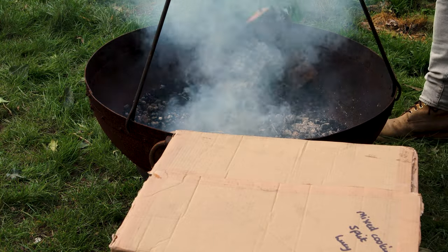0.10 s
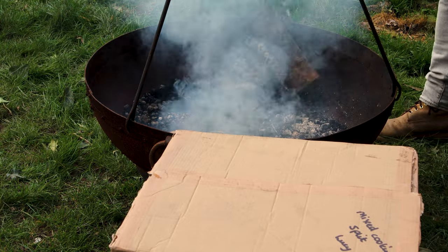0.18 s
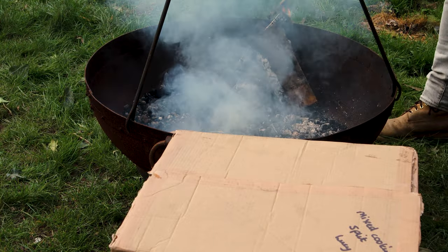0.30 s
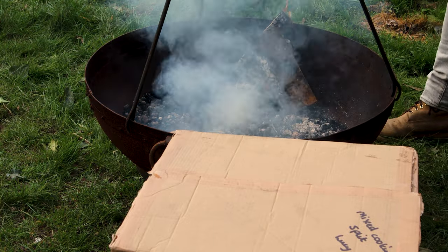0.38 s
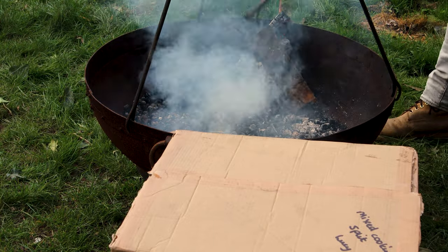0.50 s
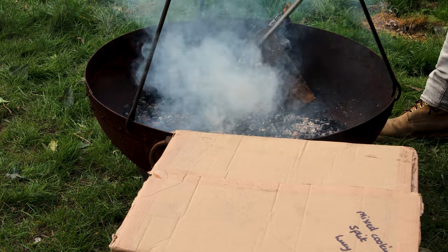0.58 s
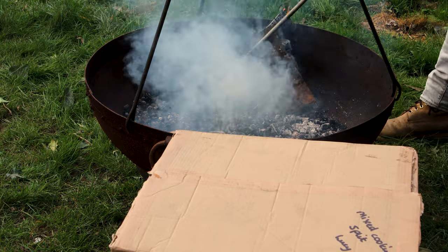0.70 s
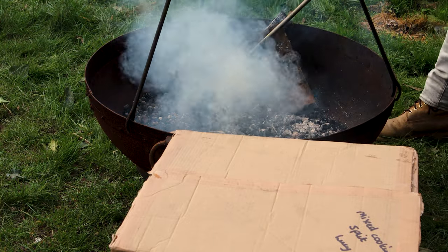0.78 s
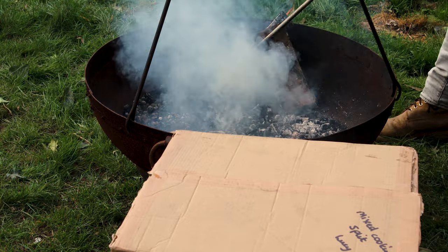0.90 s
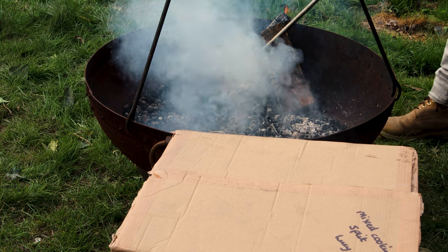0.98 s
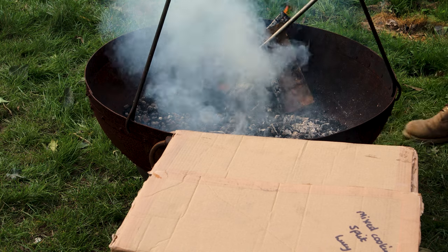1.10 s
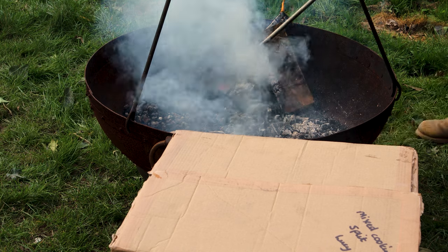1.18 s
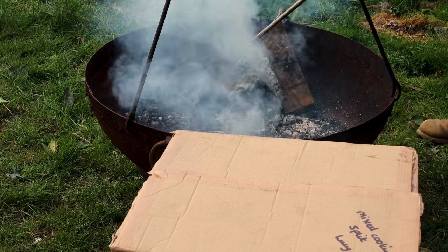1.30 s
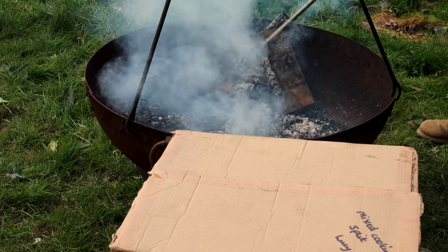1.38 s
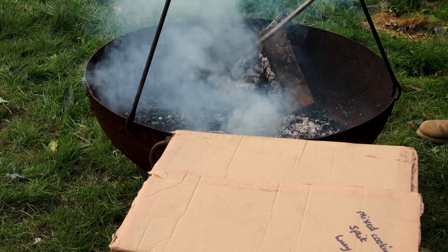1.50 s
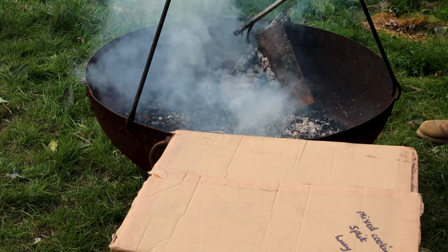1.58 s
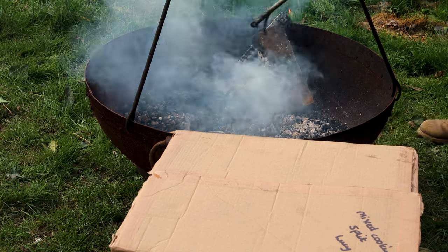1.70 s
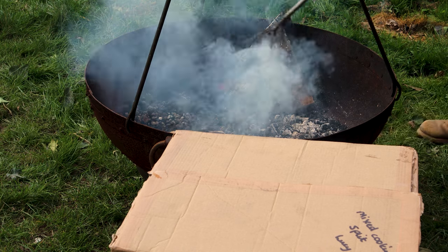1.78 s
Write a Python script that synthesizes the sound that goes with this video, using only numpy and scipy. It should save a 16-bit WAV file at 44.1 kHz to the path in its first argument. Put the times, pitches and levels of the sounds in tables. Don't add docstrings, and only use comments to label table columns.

```python
import sys
import numpy as np
from scipy import signal
from scipy.fft import rfft, irfft
from scipy.io import wavfile
from scipy.ndimage import uniform_filter1d

SR = 44100
rng = np.random.default_rng(int(sys.argv[2]) if len(sys.argv) > 2 else 0)


def elevation(decibels):
    levels = np.asarray(decibels, float)
    return 10 ** (levels / 20)


def waveform_to_disk(signal):
    frames = np.transpose(np.atleast_2d(signal))
    scaled = np.clip(frames, -1, 1) * 32767
    samples = np.round(scaled).astype(np.int16)
    wavfile.write(sys.argv[1], SR, samples)


N = 79380
T = np.arange(N) / SR
DROP_S = 0.2476
EVENT = 4000


def unit(x):
    return x / np.sqrt(np.mean(x ** 2))


def spectrum_db(points, hz):
    f, level = np.array(points).T
    return np.interp(np.log(np.maximum(hz, 1)), np.log(f), level)


def modes(hz, db, t60):
    t = T[:SR // 3, None]
    decay = np.exp(-np.log(1000) * t / np.maximum(t60, .002))
    h = (elevation(db) * decay * np.sin(2 * np.pi * hz * t)).sum(1)
    return h / np.sqrt(np.sum(h ** 2))


def dense_modes(points, t60, count):
    low, high = points[0][0], points[-1][0]
    place, sign, life = rng.random((count, 3)).T
    hz = low + (high - low) * (np.arange(count) + place) / count
    decay_s = t60 * (0.27 + 1.8 * life) * (hz / 2000) ** -.4
    return modes(hz * np.sign(sign - .5), spectrum_db(points, hz), decay_s)


def burst(start, attack, hold, release):
    t = T - start
    return np.clip(t / max(attack, 1e-4), 0, 1) * np.exp(-np.clip(t - hold, 0, 9) / max(release, 1e-4))


def grains(rate, spread_db):
    chance, sign = rng.random((2, N))
    size = elevation(spread_db * rng.exponential(size=N))
    return unit((chance < rate / SR) * np.sign(sign - .5) * size)


def wander(rate):
    k = int(SR / rate)
    steps = np.repeat(rng.standard_normal(N // k + 1), k)
    return unit(uniform_filter1d(uniform_filter1d(steps, k), k)[:N])


def strike(force, body):
    return signal.fftconvolve(force, body)[:N]


def ringdown(t60):
    t = T[:EVENT]
    return np.exp(-np.log(1000) * t / max(t60, .001)) * np.clip(t / 0.0007, 0, 1)


def drop_force():
    return burst(DROP_S, attack=0.0019, hold=0.003, release=0.0057)


# f/Hz, level/dB per Hz
CLANK = [(290, -29.5), (650, -3.5), (1100, -18), (1390, -3.5), (1990, -2), (2300, -9), (3000, -4),
         (3800, -8), (4720, -20), (6000, -18), (7800, -52), (13200, -120)]


def log_drop():
    fall = strike(elevation(1) * drop_force() * grains(9000, 1.5), dense_modes(CLANK, t60=0.075, count=330))
    clatter = elevation(1.8 * wander(420))
    damping = burst(DROP_S, 0, hold=0.05, release=0.052)
    return fall * clatter * damping


# t/s, length/s, tongs and iron level/dB, log level/dB, charcoal level/dB
CONTACTS = [(.003, 0.017, -58, -58, -45.5), (0.128, 0.0034, -63, -36.5, -38),
            (0.136, 0.0063, -64, -56, -31.5), (0.143, 0.011, -40.5, -35.5, -51),
            (0.159, 0.042, -55.5, -44, -47), (0.222, .008, -56, -51.5, -49.5),
            (0.229, 0.012, -53, -49, -44), (0.322, 0.018, -39.5, -35, -41),
            (0.4778, 0.0006, -45.5, -50, -31), (0.48, 0.02, -60, -50.5, -47),
            (0.6693, 0.0021, -38.5, -39.5, -37.5), (0.6744, 0.0028, -63, -38, -46),
            (0.751, 0.02, -75, -50.5, -50), (0.805, 0.0083, -50, -52.5, -62.5),
            (0.82, .008, -51, -63, -53.5), (0.8303, 0.0091, -38.5, -37.5, -34),
            (0.856, 0.02, -50.5, -44.5, -59.5), (0.884, 0.0256, -56, -45, -60.5),
            (1.068, 0.0283, -63, -65.5, -66), (1.4245, 0.0044, -38.5, -54, -48),
            (1.43, 0.011, -62, -58, -55.5)]


def contact_forces():
    touches = np.array([burst(s, 0.00024 + 0.051 * length, length, 0.00067 + 0.27 * length)
                        for s, length, *_ in CONTACTS])
    iron, log, grit = elevation(np.array(CONTACTS)[:, 2:]).T @ touches
    log = log + elevation(-9) * drop_force()
    grit = grit + elevation(-18.5) * burst(DROP_S, 0.0019, hold=0.006, release=0.012)
    return iron, log, grit


# t/s, level/dB
STIR = [(0, -54), (.1, -53), (.2, -52.5), (.36, -53.5), (.47, -58), (.56, -58.5), (.655, -70), (.7, -52),
        (.8, -58), (.92, -56.5), (1.0, -60), (1.22, -58.5), (1.28, -69), (1.8, -71)]


def stirring_db():
    return np.interp(T, *np.array(STIR).T)


def driven(body, push, rustle_db):
    contact = push * grains(9000, 2.5)
    rustle = elevation(rustle_db + stirring_db() + 0.83 * 20 / 20 * wander(25)) * grains(6000, 3.2)
    return strike(contact + rustle, body)


# f/Hz, level/dB per Hz
IRON = [(350, -39), (600, -12.5), (833, -7.5), (1630, -4.5), (2450, -6), (2700, -3.5), (3820, -7),
        (4580, -26), (6000, -28), (7800, -55), (13200, -120)]


def iron_rattle(push):
    return driven(dense_modes(IRON, t60=0.048, count=90), push, rustle_db=-11.5)


# f/Hz, level/dB, T60/s
BOWL = [(398, -0.5, 0.12), (588, -15, 0.2), (815, -1.5, 0.074), (1390, 12.5, 0.035), (1710, 5.5, 0.04),
        (2400, -12.5, 0.032), (3050, -9.5, 0.15), (3450, -5.5, 0.046), (3400, -26.5, 0.096),
        (3400, -20.5, 0.17), (3560, -19, 0.034), (3520, -13.5, 0.1), (5200, -21, 0.033),
        (7300, -20.5, 0.093)]


def bowl_ring(iron_push):
    force = elevation(-6) * iron_push + elevation(-11.5) * drop_force()
    return strike(force * grains(9000, 4.4), modes(*np.array(BOWL).T))


# f/Hz, level/dB, T60/s
LOG = [(213, -3, 0.074), (291, -7.5, 0.098), (353, 2.5, 0.017), (420, 1, 0.048), (568, 8, 0.023),
       (875, 2.5, 0.017), (1057, -12.5, 0.019)]


def log_knock(push):
    return driven(modes(*np.array(LOG).T), push, rustle_db=-3.5)


# t/s, level/dB, f/Hz, T60/s
KNOCKS = [(0.031, -41.5, 2475, 0.046), (0.03, -48, 1556, 0.049), (0.0391, -35.5, 202, 0.068),
          (0.114, -46.5, 1686, 0.16), (0.133, -37, 3950, 0.041), (0.138, -20, 316, 0.028),
          (.152, -33, 420, 0.048), (.147, -21, 596, .03), (.158, -22.5, 538, 0.025),
          (.251, -0.5, 738, 0.014), (.252, -11, 398, 0.15), (.255, -25, 690, 0.089),
          (0.25, -1.5, 2844, 0.037), (0.251, -8, 2453, 0.07), (.27, -33, 301, 0.33), (.3, -37.5, 233, 0.31),
          (.3288, -23, 2420, 0.018), (.329, -22, 3050, 0.018), (.3415, -20, 2240, 0.015),
          (.37, -40.5, 420, 0.14), (0.451, -37.5, 249, 0.09), (0.4789, -25.5, 3900, 0.009),
          (0.6682, -29, 912, 0.031), (.6686, -30, 2320, 0.013), (.6703, -24.5, 527, 0.027),
          (0.6756, -28, 476, 0.014), (0.6718, -35.5, 4400, 0.014), (.705, -38.5, 191, 0.14),
          (0.8305, -32.5, 2950, 0.015), (.835, -33, 2310, .012), (0.6695, -29, 7760, 0.011),
          (0.76, -36.5, 375, 0.055), (0.836, -33.5, 435, 0.099), (0.846, -27.5, 406, 0.038),
          (0.8825, -31, 1620, 0.013), (0.8867, -25.5, 1830, 0.013), (0.887, -23, 500, 0.0064),
          (0.892, -35, 1300, 0.0094), (.897, -30, 1560, 0.022), (1.078, -47, 1420, 0.0099),
          (1.095, -48, 1475, 0.014), (1.4227, -20, 595, 0.024), (1.4245, -33.5, 1271, 0.025),
          (1.427, -36, 1890, 0.01), (1.4231, -29.5, 368, 0.051), (1.4256, -32.5, 1070, 0.026),
          (1.4257, -33.5, 3266, 0.026), (1.4262, -36.5, 4340, .018), (1.428, -45, 2510, 0.051),
          (1.455, -45.5, 187, 0.13), (1.5708, -10.5, 1950, 0.00074), (1.574, -35.5, 700, 0.0064),
          (1.5926, -12.5, 2000, 0.00069), (1.594, -39, 510, 0.01)]


def knocks():
    out = np.zeros(N + EVENT)
    for s, db, hz, t60 in KNOCKS:
        out[int(s * SR):][:EVENT] -= elevation(db) * ringdown(t60) * np.sin(2 * np.pi * hz * T[:EVENT])
    return out[:N]


# f/Hz, level/dB, T60/s
TONGS = [(1513, -29, 0.15), (1660, -4, 0.1), (1850, -5, 0.095), (1930, -7, 0.099), (2000, -13.5, 0.067),
         (2463, 1.5, 0.051), (2660, -22, 0.039), (2870, -4.5, 0.066), (3290, -8, 0.029), (3500, -10, 0.061),
         (3710, -6, 0.031)]


def tongs_chatter():
    bounce = elevation(-21.5) * burst(.328, .001, hold=.0165, release=.0015) * grains(2700, 3.24)
    return strike(bounce, modes(*np.array(TONGS).T))


# f/Hz, level/dB per Hz
GRIT = [(880, -47.5), (1500, -14), (3730, 5), (5110, -2.5), (5630, -6.5), (7410, 0), (9850, -4),
        (10900, -14), (15600, -4.5)]


def charcoal(push):
    body = dense_modes(GRIT, t60=0.0038, count=120)
    crackle = elevation(-75.5) * grains(110, 1.8)
    return driven(body, push, rustle_db=-7) + strike(crackle, body)


# f/Hz, level/dB per Hz
RASP = [(1060, -35), (1800, -4.5), (2680, -9.5), (3640, -1), (7000, -19), (9100, -49.5), (15400, -120)]


def rasp():
    slips = elevation(-5.5 + stirring_db()) * grains(3300, 2.5)
    return strike(slips, dense_modes(RASP, t60=0.0038, count=60))


def fire_bowl():
    iron, log, grit = contact_forces()
    metal = log_drop() + iron_rattle(iron) + bowl_ring(iron) + tongs_chatter()
    return metal + log_knock(log) + charcoal(grit) + rasp() + knocks()


# t/s, level/dB, f/Hz
TICKS = [(0.4607, -30.5, 3010), (0.5125, -35, 4140), (0.5568, -36, 3050), (0.563, -34.5, 12060),
         (0.5682, -52, 4180), (0.5847, -39.5, 3300), (0.618, -33, 6870), (0.6848, -36.5, 4900),
         (0.6951, -35, 3300), (0.7234, -44, 2936), (0.809, -33, 3520), (0.8608, -54, 3120),
         (0.8805, -34, 2480), (0.9418, -36.5, 2390), (0.9802, -35, 4200), (1.042, -34.5, 3810),
         (1.0993, -38, 3910), (1.259, -31.5, 2640), (1.2885, -48, 3578), (1.329, -43, 3040),
         (1.4797, -39.5, 3860), (1.498, -42.5, 5500), (1.5027, -41, 3250), (1.5243, -39, 8600),
         (1.5288, -42, 9100), (1.5706, -29.5, 3130), (1.5959, -28.5, 2740), (1.6128, -48, 8000),
         (1.6212, -39, 3100), (1.6692, -40.5, 3140), (1.718, -42, 3800), (1.734, -41, 4120)]


def embers():
    out = np.zeros(N + EVENT)
    snap_band = signal.butter(1, [2600, 12000], "band", fs=SR, output="sos")
    for s, db, hz in TICKS:
        snap = elevation(6) * signal.sosfilt(snap_band, rng.standard_normal(EVENT))
        tone = np.sin(2 * np.pi * hz * T[:EVENT])
        start = int((s - .0002) * SR)
        out[start:][:EVENT] += elevation(db - 8) * ringdown(0.0074) * (tone + snap)
    return out[:N]


def echo(x):
    t = T[:SR // 2]
    tail = np.exp(-np.log(1000) * t / 0.32) * np.clip(t / 0.03, 0, 1)
    h = rng.standard_normal(len(t)) * tail
    h = signal.sosfilt(signal.butter(2, 4200, fs=SR, output="sos"), h)
    return x + elevation(-28.5) * strike(x, h / np.sqrt(np.sum(h ** 2)))


def rumble():
    band = signal.butter(2, [40, 163], "band", fs=SR, output="sos")
    noise = unit(signal.sosfilt(band, rng.standard_normal(N)))
    return noise * elevation(stirring_db() / 2 - 35.5 + 6.1 * wander(42))


# f/Hz, level/dB
GARDEN = [(18, -41.5), (30, -17), (141, 4), (411, -9.5), (507, -11), (1600, -19), (3800, -29),
          (14100, -27.5), (15600, -38)]


def garden():
    hz, floor = np.fft.rfftfreq(N, 1 / SR), 0
    for centre in 30 * 2 ** np.arange(0, 9.1, .75):
        octaves = np.log2(np.maximum(hz, 1) / centre)
        band = np.exp(-(octaves / .5) ** 2) * elevation(spectrum_db(GARDEN, hz))
        floor = floor + irfft(rfft(rng.standard_normal(N)) * band, N) * elevation(2.6 * wander(3.1))
    bird = burst(.634, 0.0059, hold=.03, release=.004) * np.sin(2 * np.pi * 4900 * T)
    return unit(floor) * elevation(-60.5) + elevation(-70) * bird


def scene():
    radiation = signal.butter(3, 177, "high", fs=SR, output="sos")
    near = signal.sosfilt(radiation, echo(fire_bowl() + embers()))
    return (near + rumble() + garden())[None]


def roll_off(x):
    return signal.sosfilt(signal.butter(12, 15770, fs=SR, output="sos"), x)


def record(dry):
    bias = -elevation(-10.6) * burst(DROP_S, .0016, hold=.0016, release=.025)
    for coupling_hz in (1.58, .92):
        bias = signal.lfilter(*signal.butter(1, coupling_hz, "high", fs=SR), bias)
    top_cut = signal.ellip(4, .2, 25, 15700, fs=SR, output="sos")
    mix = signal.sosfilt(top_cut, np.clip(dry + bias, -1, 1))
    return roll_off(np.clip(mix, -1, 1))


dry = scene()
out = record(dry)
waveform_to_disk(out)
```